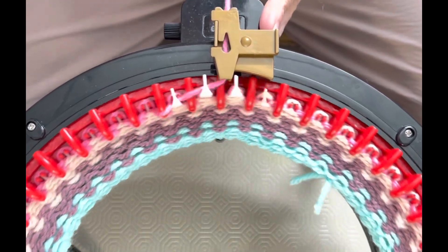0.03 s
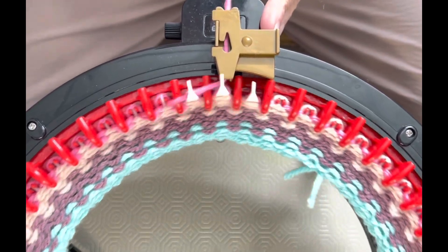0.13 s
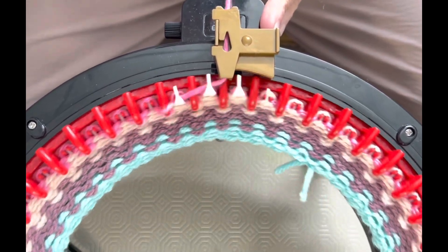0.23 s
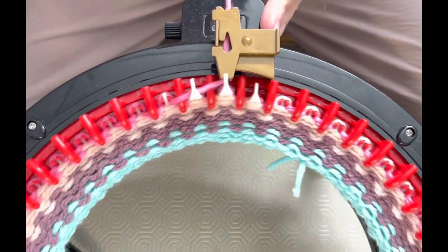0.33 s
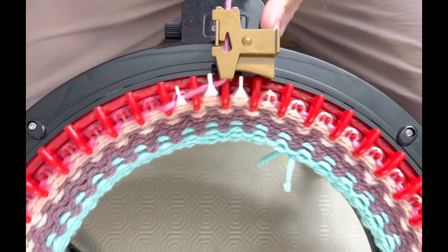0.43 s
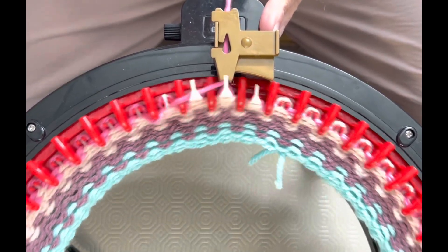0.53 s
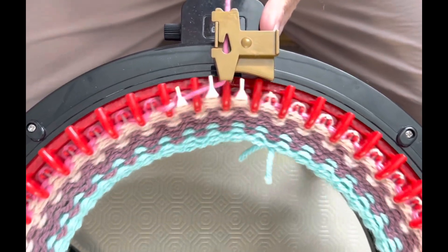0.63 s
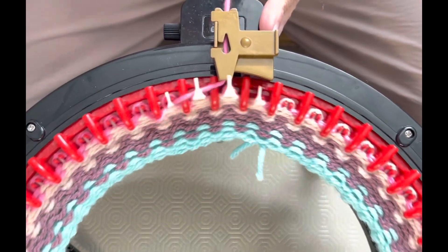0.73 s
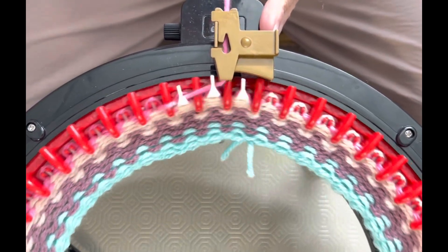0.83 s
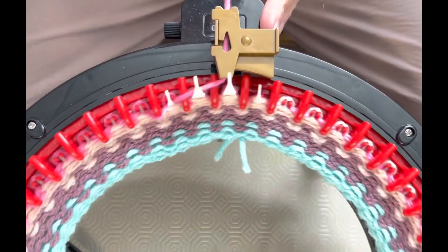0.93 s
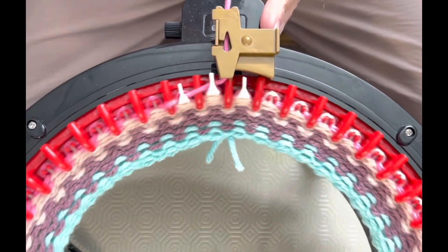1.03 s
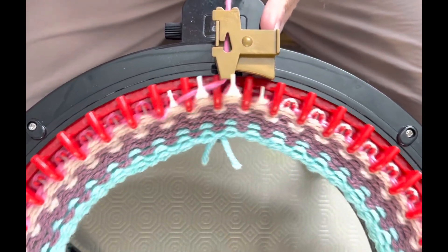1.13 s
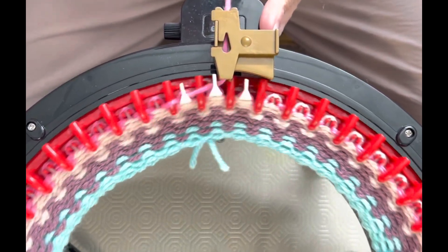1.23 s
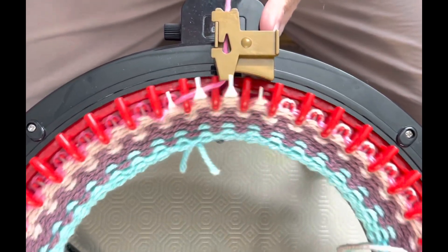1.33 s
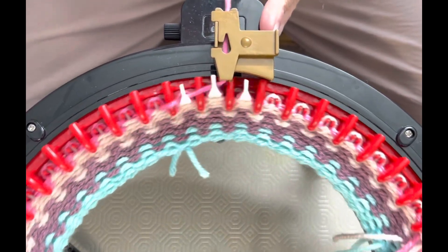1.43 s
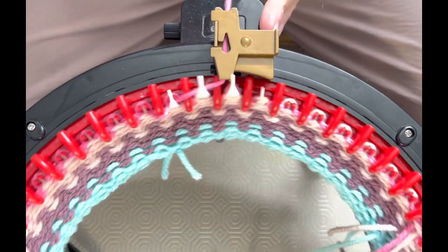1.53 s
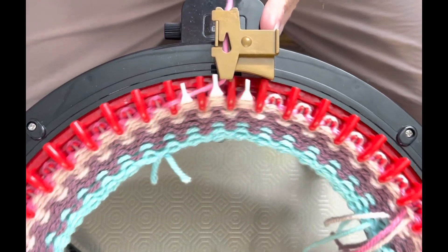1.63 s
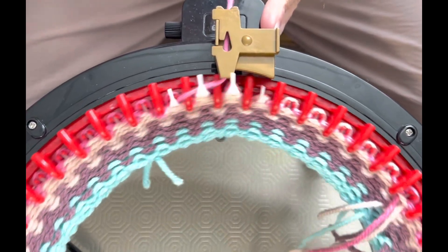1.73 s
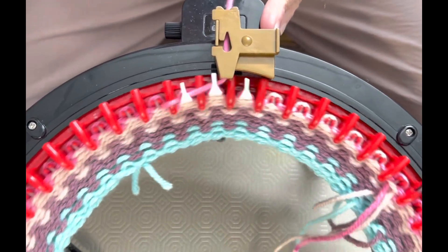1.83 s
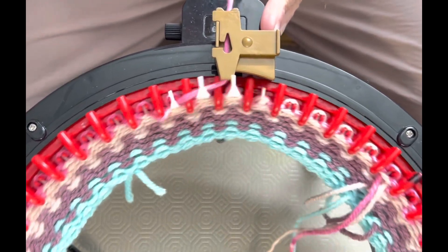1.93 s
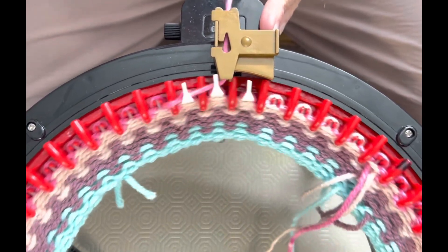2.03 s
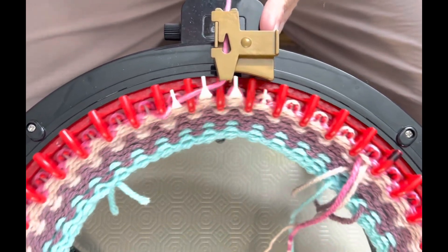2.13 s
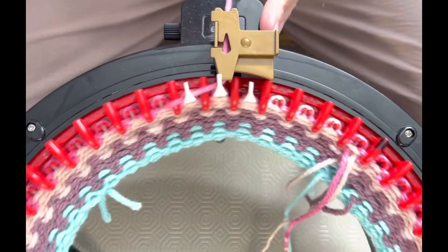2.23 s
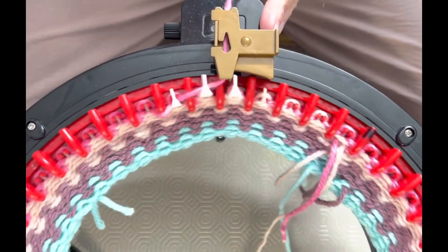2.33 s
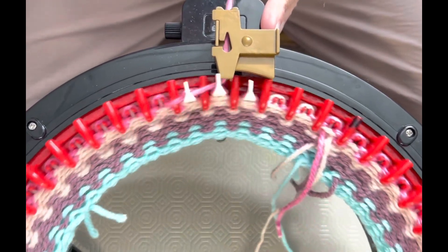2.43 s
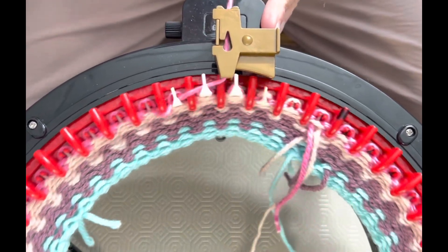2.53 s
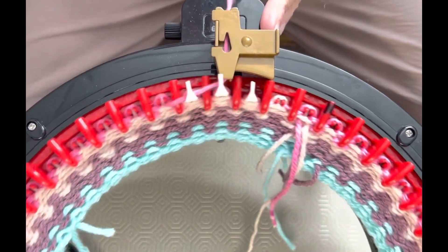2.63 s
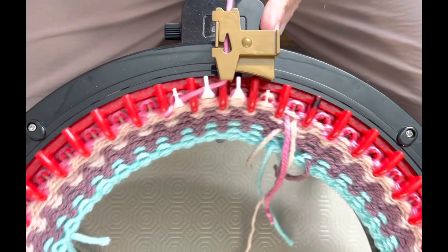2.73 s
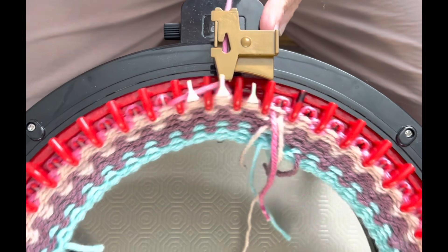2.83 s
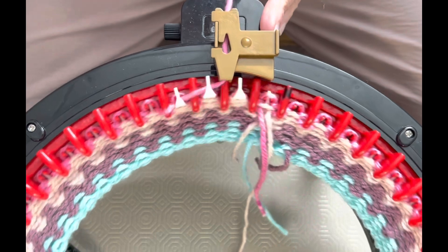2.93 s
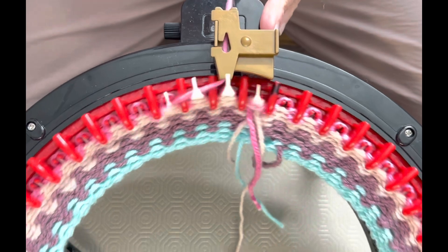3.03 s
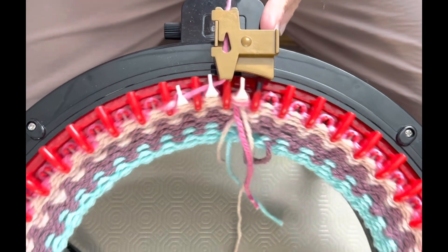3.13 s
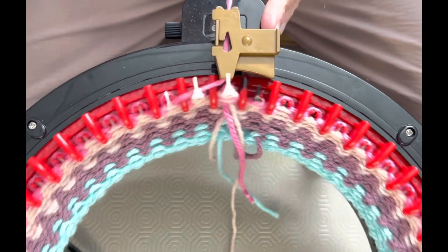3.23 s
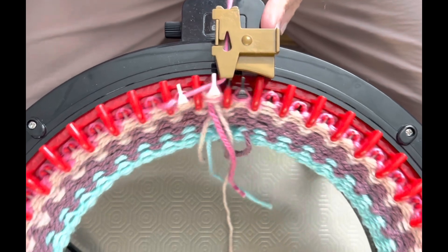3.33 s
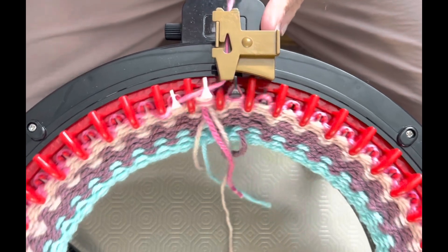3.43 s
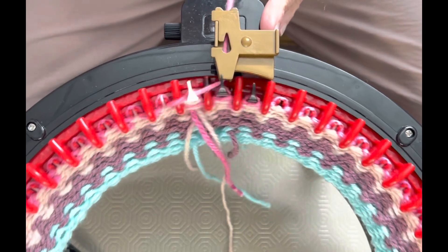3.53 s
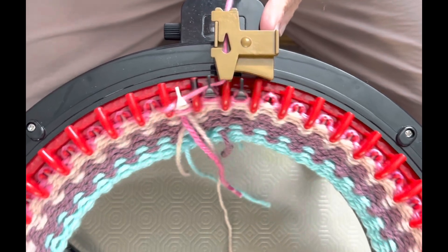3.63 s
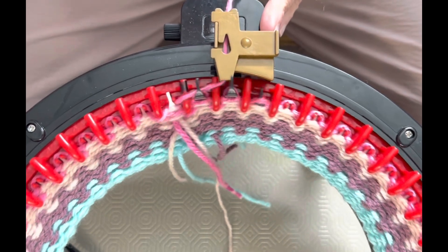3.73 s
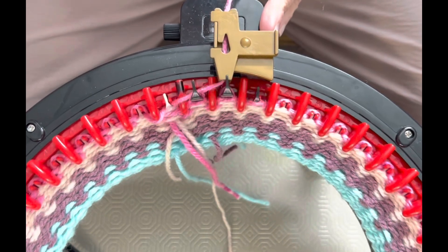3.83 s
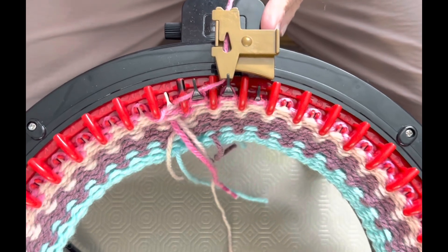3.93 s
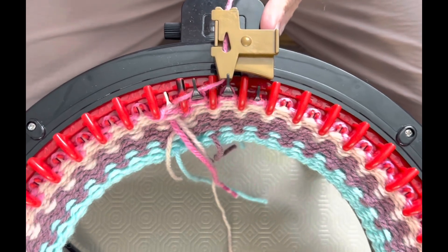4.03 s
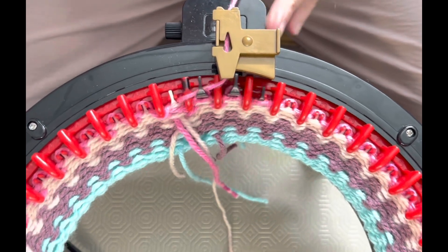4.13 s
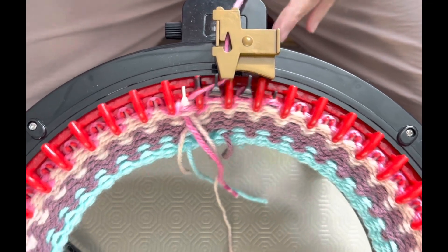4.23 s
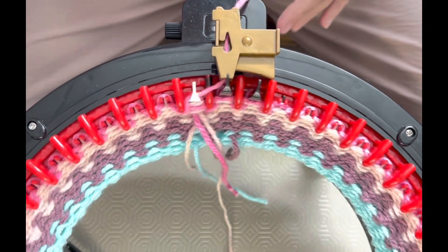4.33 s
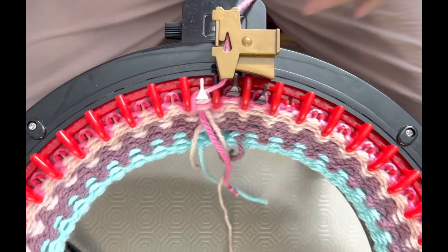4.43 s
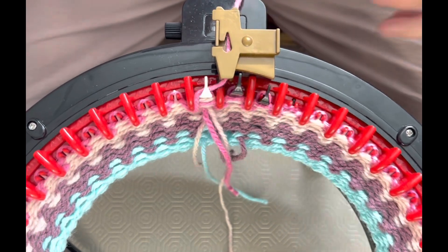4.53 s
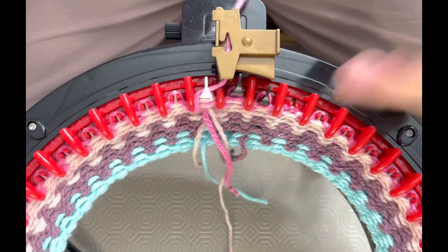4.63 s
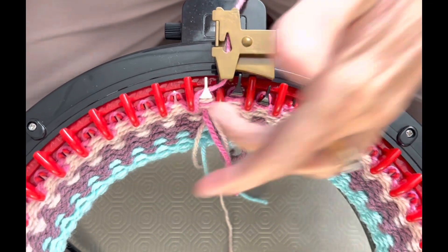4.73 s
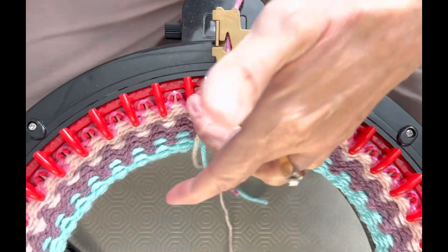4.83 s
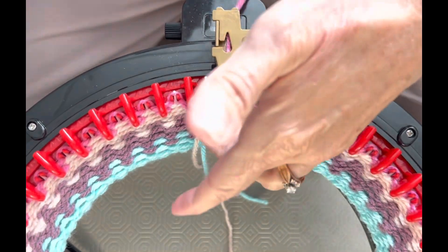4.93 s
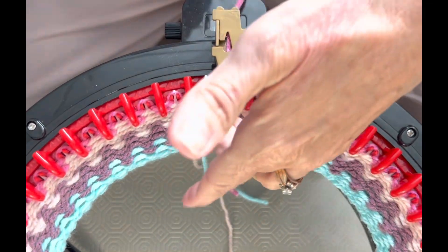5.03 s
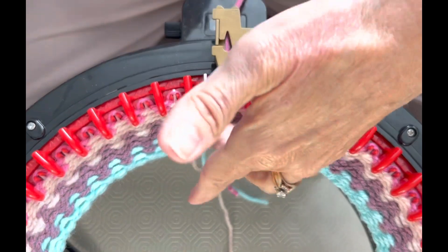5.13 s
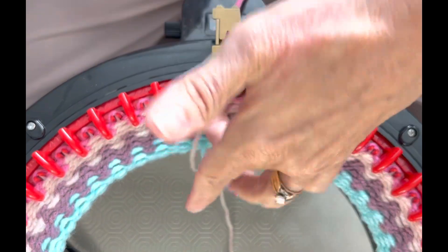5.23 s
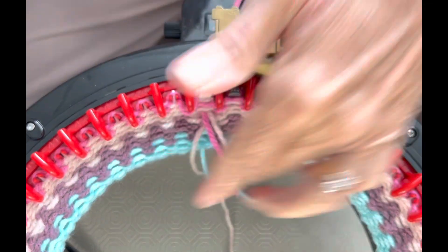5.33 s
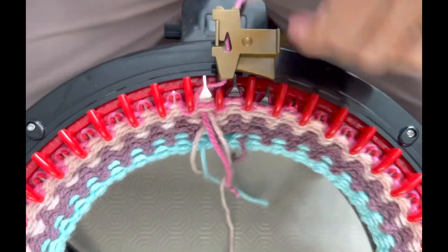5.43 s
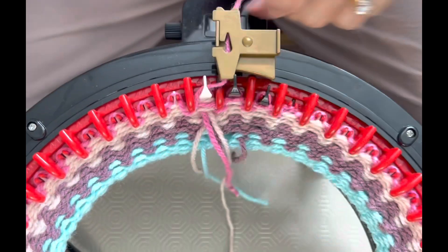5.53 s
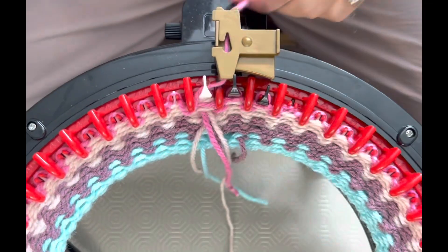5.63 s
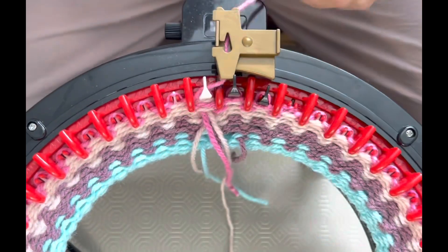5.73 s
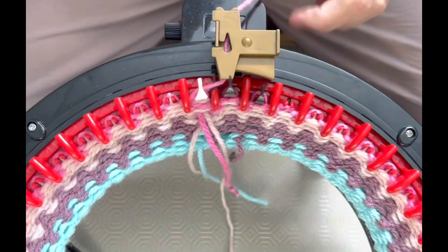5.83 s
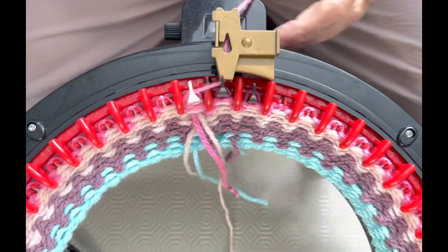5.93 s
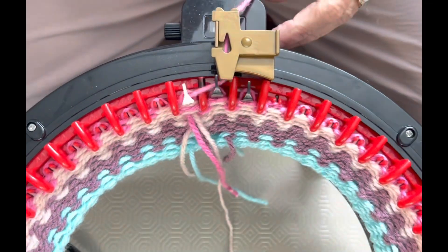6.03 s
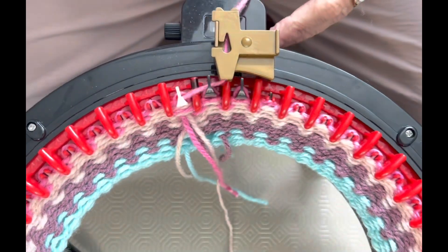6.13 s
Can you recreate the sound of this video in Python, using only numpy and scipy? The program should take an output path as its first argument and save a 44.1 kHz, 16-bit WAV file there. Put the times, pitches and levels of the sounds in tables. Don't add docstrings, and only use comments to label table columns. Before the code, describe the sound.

Close stereo pickup of a hand-turned plastic knitting machine indoors, with little echo. Uneven ticks, taps and gear thuds run over scraping needles and hissing yarn. A few harder snaps precede one hard hollow bang as the crank catches, followed by a second knock and dwindling clatter. Near silence holds only faint scuffs and nudged needles before slower, softer clicking starts again.

```python
import sys
import numpy as np
from scipy import signal
from scipy.fft import rfft, irfft
from scipy.io import wavfile
from scipy.ndimage import uniform_filter1d, minimum_filter1d

SR = 44100
rng = np.random.default_rng(int(sys.argv[2]) if len(sys.argv) > 2 else 0)


def boost(x):
    u = np.asarray(x, float) / 20
    return 10 ** u


def transcribe(signal):
    frames = np.atleast_2d(signal).T
    limited = np.clip(frames, -1, 1)
    pcm = np.round(limited * 32767).astype(np.int16)
    wavfile.write(sys.argv[1], SR, pcm)


N = 272141

# pitch_hz [Hz], density_db [dB per Hz]
AIR_SPECTRUM = [(30, 0.5), (120, 4), (230, 6), (680, -24), (1300, -16.5), (1800, -32.5), (5000, -31),
                (15000, -38)]
# pitch_hz [Hz], t60_s [s]
ROOM_DECAY = [(200, .24), (530, .2), (1400, .15), (3700, .115), (9700, .1)]
# time_s [s], level_db [dB re steady cranking]
CRANK_EFFORT = [(0.0, -1.5), (1.5, -0.68), (3.44, -1.06), (3.76, -2.5), (3.93, -4.5), (4.05, -22),
                (4.11, -7), (4.14, 0.5), (4.331, -2), (4.5, -9), (4.57, -28.5), (4.91, -41.5), (5.26, -19),
                (5.4, -37), (5.62, -41), (5.879, -2.5), (5.98, -9), (6.17, -9)]
# firmest_s [s], level_db [dB], fade_db_per_s [dB/s]
WOOL_TOUCHES = [
    (3.81, -47, 230),
    (5.14, -66.5, 151),
    (5.29, -68.5, 419.5),
    (5.36, -79.5, 82.5),
    (5.675, -64.5, 42),
    (6.08, -70, 39),
]
# pitch_hz [Hz], density_db [dB per Hz]
WOOL_SPECTRUM = [(1500, 0), (5000, 0.5), (6000, 7), (7000, 1), (10500, 0), (11800, -18), (14500, 2),
                 (15800, 3)]
# firmest_s [s], level_db [dB], fade_db_per_s [dB/s]
FRAME_SCUFFS = [
    (4.52, -69, 199.5),
    (5.27, -59.5, 196.5),
    (5.57, -61, 223.5),
    (5.7, -61, 45),
]
# pitch_hz [Hz], density_db [dB per Hz]
FRAME_SPECTRUM = [(90, -15), (250, 0.5), (450, 2), (800, -16.5)]
# pitch_hz [Hz], density_db [dB per Hz]
SLIDE_SPECTRUM = [(300, -23), (500, -1.5), (1000, -5.5), (1800, -11), (2600, -7.5), (3400, -10),
                  (4000, -19), (6000, -16), (7000, -41.5)]
# pitch_hz [Hz], density_db [dB per Hz]
YARN_SPECTRUM = [(3500, -5.5), (5500, -4.5), (6800, -5), (8300, -2.5), (10000, -4.5), (11600, -10.5),
                 (13000, -8), (15200, -4.5), (15800, -0.5)]
# pitch_hz [Hz], density_db [dB per Hz]
GEAR_SPECTRUM = [(25, -32.5), (50, 3.5), (90, -0.5), (125, 10), (190, 3), (260, 4), (400, 2), (600, -8.5)]
# pitch_hz [Hz], width_hz [Hz], level_db [dB]
RING_MODES = [(950, 300, -5), (1450, 320, -4), (1750, 320, -4), (2100, 300, -1), (2800, 500, 1),
              (3400, 500, -1), (4600, 900, -8)]
# pitch_hz [Hz], width_hz [Hz], level_db [dB]
HOUSING_MODES = [(251, 24, -15.5), (302, 70, -21.5), (411, 21, 7.5), (480, 54, 4.5), (590, 53, 6),
                 (646, 34, 8), (750, 75, 1)]
# start_s [s], level_db [dB], pitch_hz [Hz], t60_s [s]
KNOCKS = [(0.522, -45, 390, 0.093), (3.455, -33, 3510, 0.1), (1.345, -28, 595, 0.015),
          (1.893, -26.5, 620, 0.021), (3.035, -31, 476, 0.03), (3.772, -6, 608, 0.023),
          (3.775, -29.5, 132, 0.16), (3.777, -34, 70, 0.13), (3.783, -8, 408.4, 0.041),
          (3.949, -19, 420, 0.041), (3.95, -20, 774, 0.022), (5.168, -28, 443, 0.017),
          (5.545, -41, 740, 0.034), (5.59, -50, 600, 0.03), (3.778, -31, 199.6, 0.069),
          (3.953, -23.5, 543, 0.029), (4.123, -38, 610, 0.018), (4.165, -39, 470, 0.03),
          (4.202, -39, 493, 0.029), (3.7, -41, 456, 0.029), (4.35, -38, 462, 0.033),
          (2.003, -36, 490, 0.028), (2.1, -42, 496, .03), (3.3, -42, 446, 0.03), (2.73, -36, 480, 0.05),
          (3.454, -39.5, 8370, 0.024), (3.454, -30, 12070, .014), (0.82, -44, 440, .03),
          (3.4535, -31, 4420, .04), (3.772, -24, 13200, .011), (3.772, -27.5, 8500, .03),
          (3.772, -18.5, 1336, .03), (3.784, -22.5, 1692, .04), (5.175, -48, 480, .15),
          (3.82, -31, 875, .05)]
# start_s [s], peak_db [dB],
# pitch_hz [Hz], t60_s [s]
LATCHES = [(0.0626, -33, 2220, 0.028), (0.17, -45, 1500, 0.03), (0.293, -34, 1410, 0.026),
           (0.389, -32, 2660, 0.043), (0.4838, -42, 1380, 0.025), (0.4996, -24, 2800, 0.024),
           (0.5152, -39, 2180, 0.028), (0.591, -39, 1610, 0.03), (0.692, -35.5, 2105, 0.038),
           (0.7267, -35, 2160, 0.03), (0.8075, -32, 3350, 0.022), (0.9087, -41, 2090, 0.022),
           (0.9298, -31, 1440, 0.028), (0.93, -32, 2100, 0.03), (1.0121, -39, 1510, 0.039),
           (1.1407, -34, 1600, 0.015), (1.278, -37, 2000, 0.037), (1.3297, -28, 1586, 0.032),
           (1.4277, -31.5, 2270, 0.038), (1.5574, -32, 2040, 0.023), (1.5823, -42, 2020, 0.03),
           (1.633, -36, 1460, 0.03), (1.733, -35, 1660, 0.034), (1.7798, -36, 1470, 0.03),
           (1.8262, -36, 2110, 0.028), (1.836, -32, 2090, 0.023), (1.8923, -42, 1630, 0.03),
           (1.9235, -37, 2480, 0.038), (2.0393, -31, 3160, 0.028), (2.1069, -35, 2090, 0.03),
           (2.1574, -40, 2880, 0.027), (2.1787, -32, 1620, 0.02), (2.2146, -34, 2120, 0.03),
           (2.254, -38, 1490, 0.025), (2.346, -38.5, 2880, 0.034), (2.372, -39, 1620, 0.026),
           (2.4104, -24, 2150, 0.026), (2.4505, -34.5, 2870, 0.03), (2.553, -36.5, 2730, 0.03),
           (2.607, -41, 1720, 0.025), (2.6232, -37, 1830, 0.034), (2.6683, -37.5, 3160, 0.03),
           (2.721, -42, 1400, 0.03), (2.7801, -41, 2040, 0.022), (2.876, -47, 1490, 0.03),
           (3.0013, -49, 1990, 0.03), (3.017, -36, 1590, 0.03), (3.0345, -34, 1450, 0.03),
           (3.2198, -39, 1550, 0.038), (3.2884, -30, 2190, 0.027),
           (3.337, -20, 1630, 0.023), (3.338, -19.5, 2920, 0.018), (3.43, -51, 5100, .02),
          (3.452, -25.5, 4600, 0.043), (3.458, -26.5, 3553, 0.037), (3.545, -46, 4800, .03),
          (3.761, -22, 4880, .018), (3.774, -16.5, 5030, 0.027), (3.772, -12, 2410, 0.02),
          (3.774, -8.5, 794, 0.023), (3.785, -17, 656.5, .05), (3.787, -24, 3012, .03),
          (3.94, -43, 2540, 0.033), (4.169, -30, 2380, 0.03), (4.187, -40, 4000, .03),
          (4.213, -40, 3270, .03), (4.249, -33.5, 4500, 0.026), (4.275, -45, 3400, .03),
          (4.351, -47, 1590, .03), (4.384, -48, 3400, .03), (4.441, -52, 2480, 0.025),
          (4.484, -54, 2000, .03), (5.033, -46.5, 1495, 0.034), (5.034, -55, 2800, .02),
          (5.047, -52, 2210, .02), (5.143, -43.5, 2190, .02), (5.151, -46.5, 3340, .035),
          (5.152, -39, 4500, 0.028), (5.223, -59, 3020, 0.022), (5.301, -42.5, 2110, 0.029),
          (5.546, -58, 2030, .02), (5.706, -50, 1460, 0.028), (5.817, -49, 3200, 0.034),
          (5.88, -29, 1990, .03), (5.968, -43.5, 2000, 0.036), (6.042, -46, 2190, .03),
          (6.066, -59, 2000, .03), (3.95, -31, 1770, .03), (3.952, -38, 2920, 0.019),
          (3.776, -16.5, 1602, 0.058), (4.8, -63, 1200, .03), (5.262, -61, 1500, .03),
          (5.555, -52, 1100, 0.032), (1.585, -33.5, 865, 0.035), (1.09, -40, 880, 0.036),
          (2.084, -44, 1990, 0.018), (2.727, -30.5, 1390, 0.024), (2.888, -37.5, 1410, .03),
          (4.333, -39, 1680, .05), (3.381, -47, 900, .02)]
# ratio [times pitch], level_db [dB]
LATCH_PARTIALS = [(.66, -9), (1., 2.5), (1.45, -6)]
# start_s [s], level_db [dB], pitch_hz [Hz], tick_db [dB re level]
TAPS = [(0.063, -27.5, 2870, -21.5), (0.168, -33, 980, -19), (0.292, -35, 1610, -31.5),
        (0.442, -38, 1000, -35), (0.498, -25.5, 2800, -21), (0.514, -28.5, 1860, -23),
        (1.226, -33.5, 1150, -18), (1.429, -30.5, 980, -15.5), (1.635, -31, 1550, -39),
        (1.711, -45, 1070, -34), (1.732, -31, 2600, -22), (1.866, -44.5, 1650, -21),
        (1.952, -34, 1320, -22), (2.039, -31, 1200, -28), (2.158, -34.5, 2820, -36),
        (2.178, -29.5, 1840, -43.5), (2.255, -27.5, 1050, -26), (2.668, -30, 1080, -24),
        (2.781, -32.5, 2130, -25), (3.015, -34.5, 960, -21), (3.109, -31.5, 1180, -24),
        (3.193, -33, 1010, -29), (3.311, -34, 1500, -24), (4.274, -41.5, 1470, -5),
        (5.143, -41.5, 1645, -30), (5.3, -39.5, 957, -15), (5.816, -40, 3320, -27), (5.841, -41, 1020, -20),
        (5.864, -36, 1006, -28), (6.042, -47, 2100, -41)]
# start_s [s], level_db [dB], pitch_hz [Hz], tick_db [dB re level]
CLICKS = [(0.085, -30.5, 1350, -33), (0.391, -36.5, 1010, -13), (0.724, -37, 2110, -50),
          (0.812, -31, 980, -15.5), (1.277, -30.5, 2300, -32), (1.328, -22, 2020, -30),
          (1.458, -33, 1020, -32), (1.48, -34, 1060, -42), (1.558, -24.5, 1980, -25.5),
          (1.837, -32.5, 1214, -23), (2.106, -37.5, 2080, -39.5), (2.264, -31.5, 1490, -15),
          (2.41, -26, 2140, -29), (2.553, -36.5, 1320, -33), (3.034, -33, 1520, -17),
          (3.221, -25.5, 1430, -23), (3.288, -37.5, 2230, -22), (3.584, -39, 991, -14),
          (3.69, -36.5, 923, -29.5), (4.081, -45, 1160, -34), (4.13, -37.5, 3400, -13),
          (4.191, -33, 1180, -22), (4.212, -39, 2050, -22), (4.321, -35.5, 1590, -32),
          (4.382, -40, 1640, -26), (4.44, -42.5, 1544, -22), (5.032, -40.5, 960, -54),
          (5.211, -51, 2990, -9), (5.391, -55.5, 1037, -15), (5.986, -44.5, 1348, -19)]
# start_s [s], level_db [dB], pitch_hz [Hz], tick_db [dB re level]
THUDS = [(0.737, -35, 1460, -41.5), (0.784, -36.5, 800, -24), (0.922, -33.5, 1970, -17.5),
         (0.93, -25.5, 1950, -20), (1.013, -34.5, 1310, -9.5), (1.09, -29.5, 800, -47),
         (1.141, -29.5, 1560, -15), (1.344, -28, 2310, -20), (1.372, -32, 1570, -42),
         (1.583, -29, 900, -31), (1.744, -32.5, 910, -24), (1.777, -33, 1520, -33), (1.826, -35, 1150, -14),
         (1.891, -28, 1130, -35), (2.214, -35, 1040, -31), (2.373, -32, 1660, -25),
         (2.45, -36.5, 2750, -16), (2.624, -31.5, 1830, -41), (2.719, -28.5, 1420, -32),
         (2.876, -35.5, 1230, -12.5), (3.518, -36, 1030, -24), (4.169, -31, 2587, -14.5),
         (4.249, -37.5, 904, -8), (4.475, -43.5, 1010, -31), (4.631, -56, 2308, -24),
         (4.799, -54, 963, -36), (4.848, -49, 920, -45), (5.261, -53, 896, -32), (5.285, -45.5, 903, -18),
         (5.705, -48.5, 1470, -28.5)]
# start_s [s], level_db [dB], pitch_hz [Hz], tick_db [dB re level], contact_ms [ms]
SNAPS = [(5.997, -46, 1500, -20, 3), (3.336, -25.5, 1710, -15.5, 1.6), (3.337, -19, 2280, -35, 1.9),
         (3.349, -22.5, 950, -44, 8.5), (3.454, -32.5, 3660, -4, 3.5), (3.457, -22, 4360, -18, 5.5),
         (3.772, -8, 2590, -27.5, 9.2), (4.094, -51, 1290, -22.5, 5), (4.132, -27.5, 3320, -21, 19),
         (3.802, -30, 1300, -14, 12), (3.813, -33, 900, -14, 15), (3.95, -25, 900, -40, 4),
         (5.047, -41.5, 1567, -47, 2.6), (5.151, -39.5, 1594, -5.5, 2.1), (5.151, -33.5, 3270, -33, 3.3),
         (5.547, -48, 902, -23, 7), (5.88, -32.5, 2000, -18, 2), (5.899, -41, 895, -35, 3),
         (5.939, -48.5, 960, -37, 6.6), (1.316, -32, 1510, -19, 13), (1.546, -40, 1500, -25, 11),
         (1.884, -37, 1060, -36, 6.5), (5.852, -37, 1150, -30, 9)]
# start_s [s], level_db [dB], pitch_hz [Hz], tick_db [dB re level], contact_ms [ms]
JAM = [
    (3.761, -14.5, 870, -20, 3.9),
    (3.772, -8, 1300, -11, 2.4),
    (3.78, -15, 765.4, -30, 8.3),
    (3.783, -19.5, 2405, -7, 26),
    (3.936, -34, 1500, -26, 6),
    (3.949, -18.5, 1260, -38, 4.2),
]
# pitch_hz [Hz], density_db [dB per Hz]
TICK_SPECTRUM = [(3000, 7), (4500, -5.5), (6000, -5), (8300, -6), (10000, -9), (11600, -13.5), (14000, -7),
                 (16800, -16)]
# pitch_hz [Hz], likeness [0 to 1], left_over_right_db [dB]
PORTS = [(0, .99, 0), (500, .96, 1.5), (900, .68, .5), (1500, .92, .5), (2700, .72, -1.5), (3800, .5, 0),
         (4900, .5, -3), (5300, .96, 0), (6400, .85, 0), (7200, .93, 0)]
# pitch_hz [Hz], lag [half turns]
PORT_LAG = [(0, 0), (900, -.18), (1500, 0), (2700, .85), (3800, .37), (4900, .55), (5450, 1), (7550, 2),
            (10280, 3), (12400, 4), (15200, 5), (17800, 5.6)]
# pitch_hz [Hz], level_db [dB re its partner]
SPARED = [(5000, -40), (5300, -10), (6000, -9), (7000, -6), (11000, -5.5), (16000, -6)]


def evened(x):
    return x / np.sqrt(np.mean(x ** 2) + 1e-20)


def coloured(x, spectrum):
    f, db = np.transpose(spectrum)
    f = np.r_[f[0] / 1.5, f, f[-1] * 1.04]
    db = np.r_[db[0] - 18, db, db[-1] - 36]
    log_hz = np.log(np.fft.rfftfreq(N, 1 / SR) + 1)
    return irfft(rfft(x) * boost(np.interp(log_hz, np.log(f), db)), N)


def patchy(spectrum, patchy_db, flicker_db):
    noise = coloured(rng.standard_normal((2, N)), spectrum)
    z = signal.stft(noise, nperseg=256)[2]
    patches = uniform_filter1d(rng.standard_normal(z.shape[1:]), size=5, axis=0)
    patches = evened(uniform_filter1d(patches, size=9, axis=1))
    flicker = evened(uniform_filter1d(rng.standard_normal(z.shape[2]), size=4))
    z = z * boost(patchy_db * patches + flicker_db * flicker)
    return evened(signal.istft(z, nperseg=256)[1][:, :N])


def ringing(modes, size=1500):
    hz, width, db = np.transpose(modes)[:, :, None]
    t = np.arange(size) / SR
    decay = boost(db) * np.exp(-np.pi * width * t)
    answer = (decay * np.sin(2 * np.pi * hz * t)).sum(0)
    return answer / np.linalg.norm(answer)


def crank(steady_db, follow):
    effort_db = np.interp(np.arange(N) / SR, *np.transpose(CRANK_EFFORT))
    return boost(steady_db + follow * effort_db)


def touches(rows, landing_db_per_s=646.5):
    t = np.arange(N) / SR
    gain = np.zeros(N)
    for s, db, fade in rows:
        gain += boost(db + np.minimum(landing_db_per_s * (t - s), -fade * (t - s)))
    return gain


def quiet_air():
    return boost(-68) * patchy(AIR_SPECTRUM, patchy_db=1.5, flicker_db=1.0)


def room(x, count=3):
    size = SR // 4
    taps = np.zeros((count, 2, size))
    at = np.arange(200, size - 20, 20) + rng.integers(0, 20, (count, 2, (size - 201) // 20))
    np.put_along_axis(taps, at, rng.choice([-1., 1.], at.shape), 2)
    hz, t, z = signal.stft(taps, SR, nperseg=256)
    t60 = np.interp(hz, *np.transpose(ROOM_DECAY))[:, None]
    tails = signal.istft(z * boost(-60 * t / t60), SR, nperseg=256)[1]
    tails = tails / np.linalg.norm(tails[0, 0])
    turn = np.pi * (np.arange(N) / SR * 37 + np.arange(count)[:, None, None] / count)
    share = np.cos(turn) * np.sqrt(2 / count)
    return signal.oaconvolve(x * share, tails, axes=2)[..., :N].sum(0)


def brushing():
    rustle = touches(WOOL_TOUCHES) * patchy(WOOL_SPECTRUM, patchy_db=2.0, flicker_db=0.6)
    scuff = touches(FRAME_SCUFFS) * patchy(FRAME_SPECTRUM, patchy_db=3.5, flicker_db=1.0)
    return rustle + scuff


def sliding():
    rub = crank(-50.5, follow=0.9) * patchy(SLIDE_SPECTRUM, patchy_db=2.0, flicker_db=2.4)
    hiss = crank(-57.5, follow=2.3) * patchy(YARN_SPECTRUM, patchy_db=-2.5, flicker_db=-0.2)
    gears = crank(-56, follow=1) * patchy(GEAR_SPECTRUM, patchy_db=2, flicker_db=1.6)
    return rub + hiss + gears


def chatter(per_s=170.0, spread_db=3, count=10):
    size_db = spread_db * np.minimum(rng.exponential(1, (2, N)), 3.1)
    size = boost(size_db) * (rng.random((2, N)) < per_s / SR)
    needle = rng.integers(0, count, N)
    own_needle = needle == np.arange(count)[:, None, None]
    puff = rng.standard_normal((2, count, 2, 300)) * np.exp(-np.arange(300) / 28)
    out = np.zeros((2, N))
    for k, (modes, db) in enumerate([(RING_MODES, -4.5), (HOUSING_MODES, -3.5)]):
        voices = signal.fftconvolve(puff[k], ringing(modes)[None, None], axes=2)
        taps = signal.oaconvolve(size[k] * own_needle, voices, axes=2)[..., :N]
        out += boost(db) * evened(taps.sum(0))
    return crank(-52.5, follow=1.8) * out


def knocks():
    t = np.arange(6000) / SR
    out = np.zeros((2, N + len(t)))
    for s, db, hz, t60 in KNOCKS:
        swell = boost(db + 4.5 - 60 * t / t60) * (1 - np.exp(-t * hz / 1.2))
        at = round(s * SR)
        out[:, at:at + len(t)] += swell * np.sin(2 * np.pi * (hz * t + rng.random((2, 1))))
    return out[:, :N]


def latches():
    t = np.arange(2500) / SR
    sagging_t = t - 3.6 * t ** 2
    attack = 1 - np.exp(-t / 0.0001)
    ratio, partial_db = np.transpose(LATCH_PARTIALS)[:, :, None, None]
    out = np.zeros((2, N + len(t)))
    for s, db, hz, t60 in LATCHES:
        detune, phase = rng.random((2, len(LATCH_PARTIALS), 2, 1))
        stray = 1 + 0.14 * (detune[:, :1] - .5) * (ratio != 1)
        turns = hz * ratio * stray * sagging_t
        modes = boost(partial_db - 60 * t * ratio / t60) * np.sin(2 * np.pi * (turns + phase))
        at = round((s + .0006) * SR)
        out[:, at:at + len(t)] += boost(db - 6.5) * modes.sum(0) * attack
    return out[:, :N]


def blows():
    t = np.arange(3000) / SR
    ring, housing = ringing(RING_MODES), ringing(HOUSING_MODES)
    out, ticks = np.zeros((2, 2, N + len(t)))
    # contacts, housing knock in dB re blow, usual contact in ms
    kinds = [(TAPS, -42, 3.23), (CLICKS, -5.5, 2.7), (THUDS, 2.2, 3.1), (SNAPS, -34, 4.), (JAM, -6.5, 4.)]
    for rows, knock_db, usual_ms in kinds:
        for s, blow_db, hz, tick_db, *own_ms in rows:
            contact_s = (own_ms[0] if own_ms else usual_ms) / 1000
            contact = np.exp(-t / contact_s) * (1 - np.exp(-t / (1.4 * contact_s)))
            rattle = rng.standard_normal((3, 2, len(t))) * contact
            needle = ringing([(hz, hz / 4, 0)])
            mid = signal.fftconvolve(rattle[0], (.9 * needle + ring)[None], axes=1)[:, :len(t)]
            knock = signal.fftconvolve(rattle[1], housing[None], axes=1)[:, :len(t)]
            tick = rattle[2] * np.exp(-t / 0.0049)
            at = round((s - .0012) * SR)
            out[:, at:at + len(t)] += boost(blow_db) * (evened(mid) + boost(knock_db) * evened(knock))
            ticks[:, at:at + len(t)] += boost(blow_db + tick_db) * evened(tick)
    dull = signal.sosfilt(signal.butter(2, 6000, fs=SR, output="sos"), out[:, :N])
    return boost(-20.0) * dull + boost(-3.5) * coloured(ticks[:, :N], TICK_SPECTRUM)


def scene():
    bass_cut = signal.butter(3, 290, "high", fs=SR, output="sos")
    hits = signal.sosfilt(bass_cut, blows() + chatter() + latches())
    hollow = knocks()
    echoes = boost(-11) * room(hits) + boost(-15.0) * room(hollow)
    return quiet_air() + echoes + brushing() + sliding() + hollow + hits


def two_ports(dry):
    hz = np.fft.rfftfreq(N, 1 / SR)
    f, likeness, balance_db = np.transpose(PORTS)
    curves = [np.pi * np.interp(hz, *np.transpose(PORT_LAG)),
              np.interp(hz, f, likeness), np.interp(hz, f, balance_db)]
    lag, same, lean_db = uniform_filter1d(uniform_filter1d(curves, size=1200), size=1200)
    bass_cut = hz ** 2 / (hz ** 2 + 28.0 ** 2)
    a, b = rfft(dry) * bass_cut * (hz < 17800)
    right = same * a * np.exp(-1j * lag) + np.sqrt(1 - same ** 2) * b
    return irfft(np.array([a * boost(lean_db / 2), right * boost(-lean_db / 2)]), N)


def thinned(x, jump_db=8, crack_db=13, size=2048, width=16, hold=400):
    pair = np.array([x[0] + x[1], x[0] - x[1]]) / 2
    hz, _, z = signal.stft(pair, SR, nperseg=size)
    bands = np.arange(len(hz)) // width
    power = np.add.reduceat(abs(z) ** 2, np.arange(0, len(hz), width), axis=1)[:, bands] + 1e-20
    spared_db = np.interp(hz, *np.transpose(SPARED), left=-200)[:, None]
    weak = power < power[::-1] * boost(2 * spared_db)
    low = (hz < 15850)[:, None]
    versions = np.array([z * low, z * (low & ~weak)])
    dull, thin = signal.istft(versions, SR, nperseg=size)[1][..., :N]
    treble = (np.diff(x, n=2, prepend=0, append=0) ** 2).sum(0)
    treble = uniform_filter1d(treble, size=hold // 2)
    jump = treble / (uniform_filter1d(np.roll(treble, size // 2), size=size) + 1e-20)
    sharp = jump > boost([[2 * jump_db], [2 * crack_db]])
    sharp = -minimum_filter1d(-1. * sharp, size=hold // 2)
    sharp = uniform_filter1d(sharp, size=hold // 4)
    mid, side = thin + sharp[0] * (dull - thin) + sharp[1] * (pair - dull)
    return np.array([mid + side, mid - side])


def top_cut(x):
    return signal.sosfilt(signal.butter(12, 17850, fs=SR, output="sos"), x)


def record(dry):
    x = two_ports(dry)
    x = .85 * np.tanh(x / .85)
    return top_cut(thinned(x))


dry = scene()
out = record(dry)
transcribe(out)
```